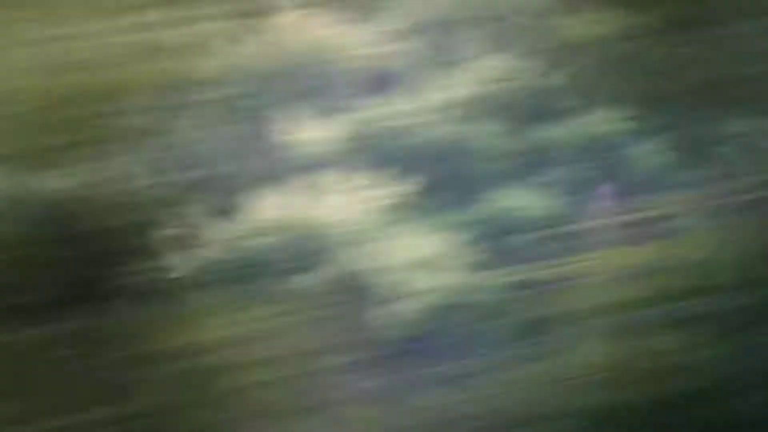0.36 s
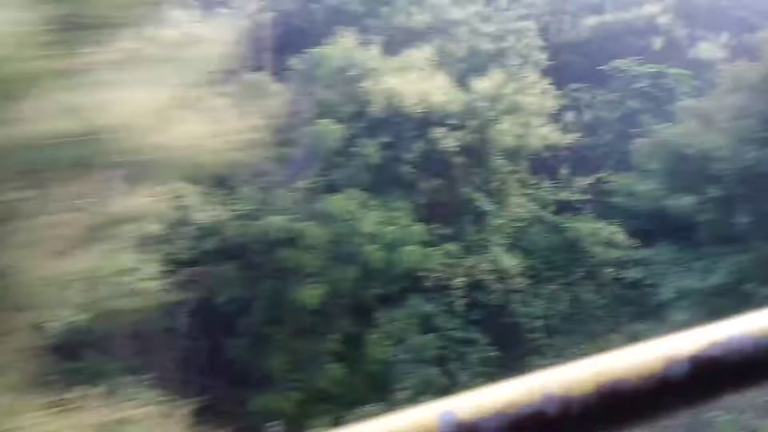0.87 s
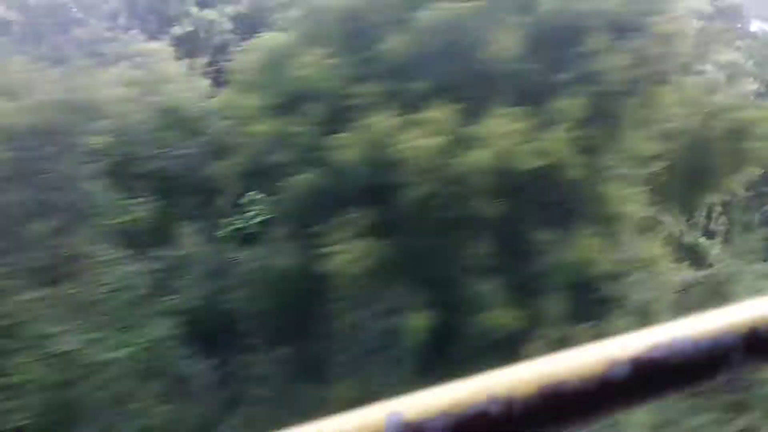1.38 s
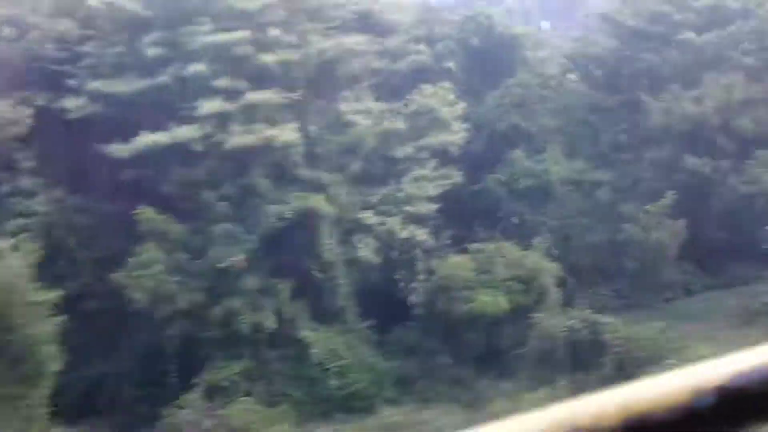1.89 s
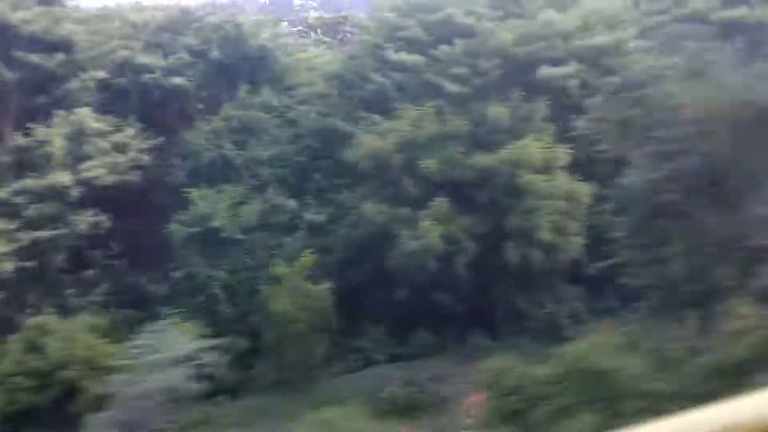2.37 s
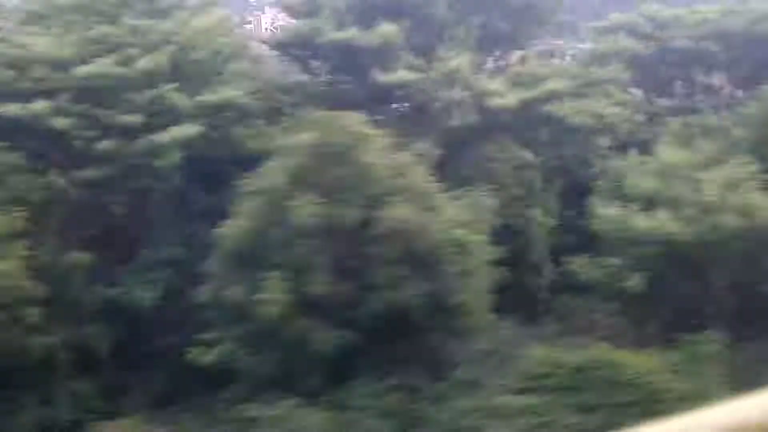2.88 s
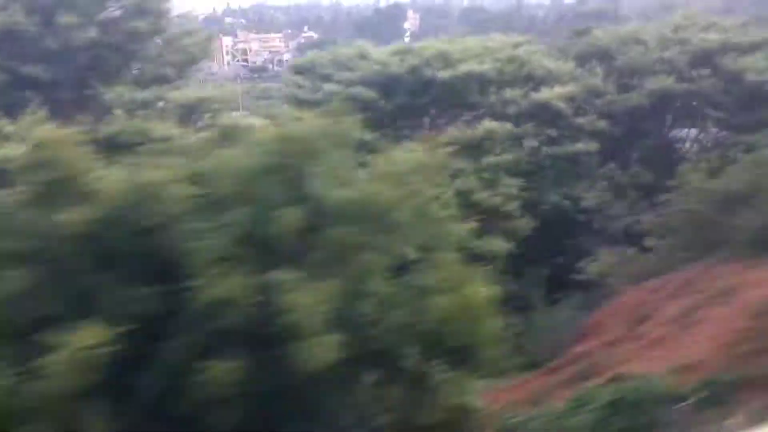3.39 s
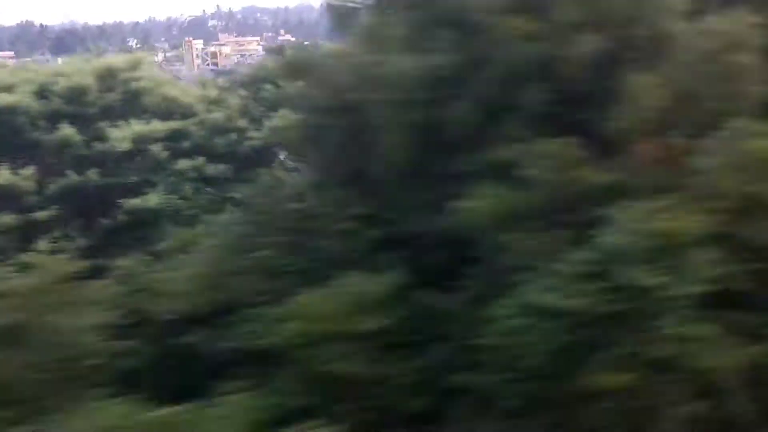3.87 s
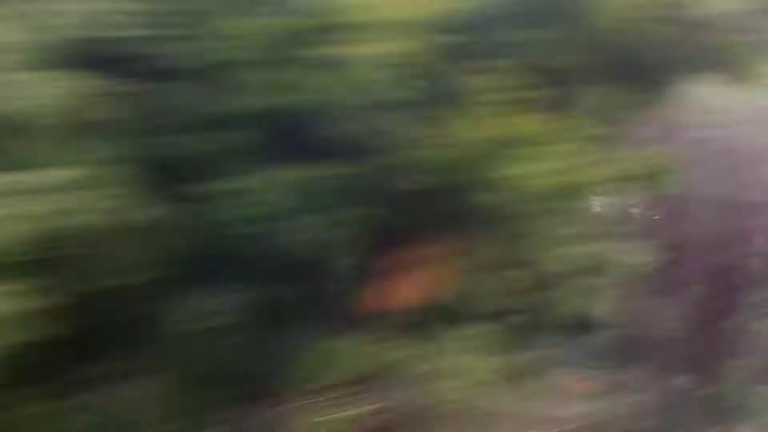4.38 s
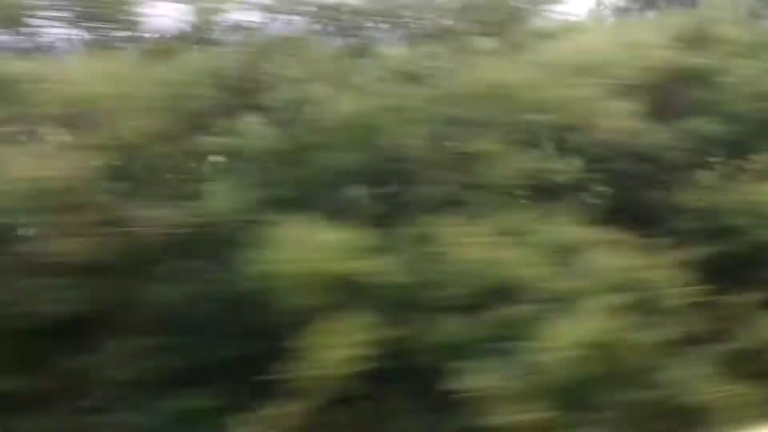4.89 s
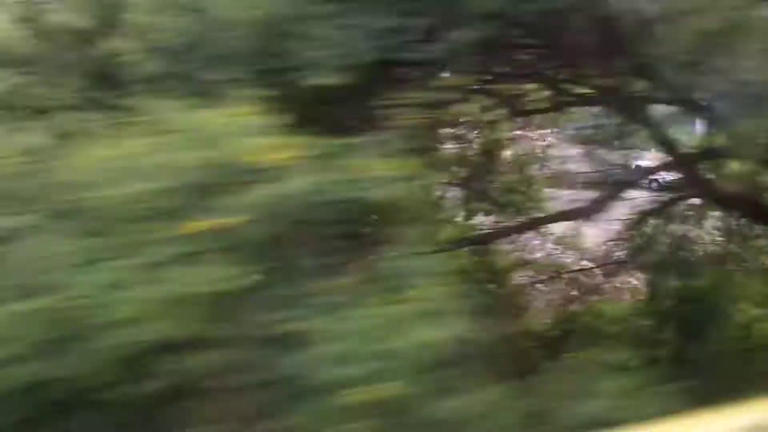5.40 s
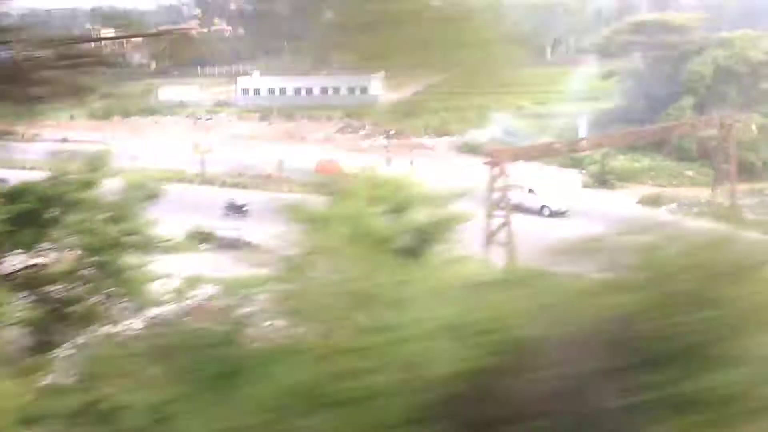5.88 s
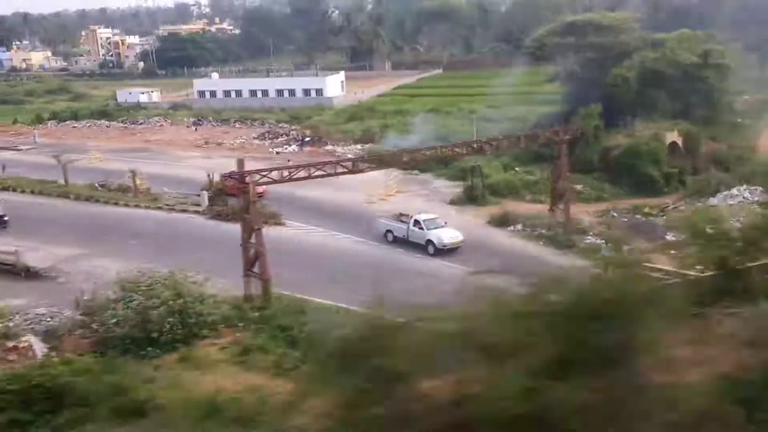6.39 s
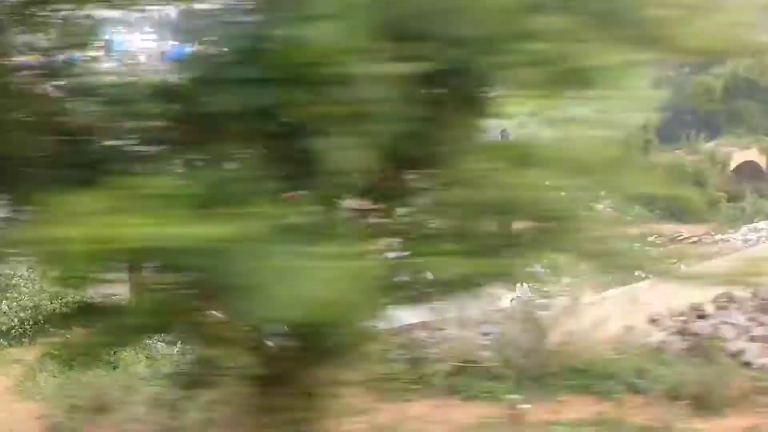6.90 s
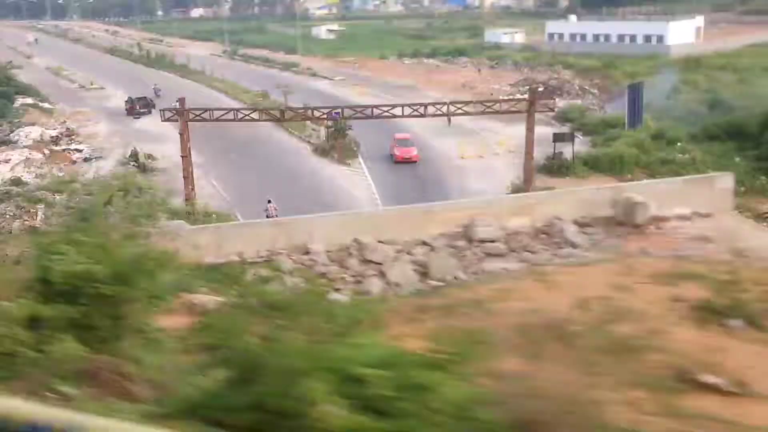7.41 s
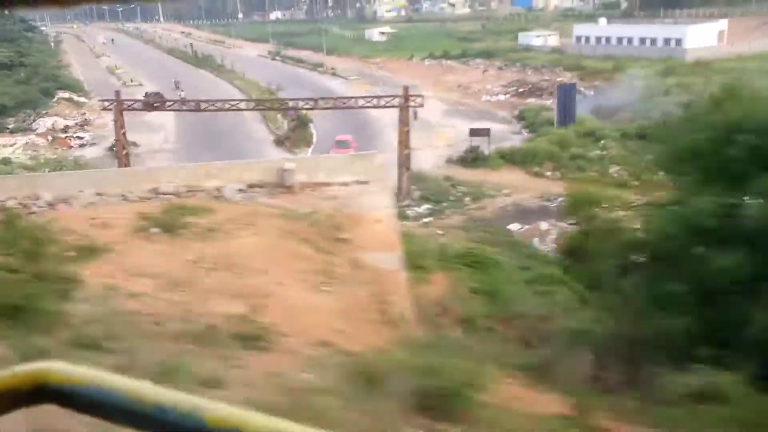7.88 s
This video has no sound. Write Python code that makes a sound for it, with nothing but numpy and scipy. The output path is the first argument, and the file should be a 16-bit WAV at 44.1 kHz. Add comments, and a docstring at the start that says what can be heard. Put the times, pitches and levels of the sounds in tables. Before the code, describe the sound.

A handheld microphone at a moving train's window catches heavy, bassy wind buffeting with short snaps. Beneath it the carriage rumbles, wheels give an airy roar, and bogies knock over joints in quick double blows. Strong gusts open the scene, crowd the middle, return after six seconds, thin out past seven and swell again at the close. Wind and wheels differ in the two channels, with little room echo.

```python
"""Wind thuds and snaps at an open window of a passenger carriage at speed, over rumble and roar.
Wheels on rails are filtered noise; knocks over the joints, mostly in pairs, are struck resonances.
The slipstream is lumpy low noise, and its eddies are clusters of jolts on the front port.
There are two microphone ports; each channel is one port minus a delayed copy of the other."""
import sys
import numpy as np
from scipy import signal
from scipy.fft import rfft, irfft, next_fast_len
from scipy.io import wavfile
from scipy.ndimage import uniform_filter1d

SR = 44100
rng = np.random.default_rng(int(sys.argv[2]) if len(sys.argv) > 2 else 0)


def wrap_up_sound(samples):
    """Save the sound to the file named by the first command line argument, as 16-bit audio."""
    columns = np.atleast_2d(samples).T
    # keep every value between -1 and 1, then stretch to whole-number steps
    tamed = np.clip(columns, -1, 1)
    steps = np.round(tamed * 32767).astype(np.int16)
    wavfile.write(sys.argv[1], SR, steps)


def nominal_scale(level):
    """Amplitude ratio for a level in decibels (scalar or array-like)."""
    x = np.asarray(level, float) / 20
    return 10 ** x


N = 353682


def rms_one(x):
    """Scale to unit rms."""
    return x / np.sqrt(np.mean(x ** 2) + 1e-20)


def in_time(rows):
    """Read the level columns of a table at every sample."""
    s, *columns = np.transpose(rows)
    return [np.interp(np.arange(N) / SR, s, column) for column in columns]


def drift(rate_hz):
    """Slow random wander of unit rms, about rate_hz changes a second."""
    hop = 40   # samples between the points of the slow curve
    settle = 2000   # points thrown away while the filter settles
    pole = np.exp(-2 * np.pi * rate_hz * hop / SR)
    steps = rng.standard_normal(N // hop + settle + 2)
    slow = signal.lfilter([1], [1, -2 * pole, pole ** 2], steps)[settle:]
    return np.interp(np.arange(N) / hop, np.arange(len(slow)), rms_one(slow))


def band(x, low_hz, high_hz, order=2):
    """Butterworth band-pass."""
    sos = signal.butter(order, [low_hz, high_hz], "band", fs=SR, output="sos")
    return signal.sosfilt(sos, x + 1e-18)


def low_pass(top_hz, order):
    """Butterworth low-pass sections."""
    return signal.butter(order, top_hz, fs=SR, output="sos")


def coloured(spectrum, shared_db, own_db, rate_hz, grain_db=0):
    """Unit-rms noise of a given spectrum whose half octaves flicker partly together; grain makes it pop."""
    size = next_fast_len(N)
    hz = np.maximum(np.arange(size // 2 + 1) * SR / size, 10)
    point_hz, point_db = np.transpose(spectrum)
    grain = nominal_scale(grain_db * np.minimum(rng.exponential(1, size), 7))
    white = rng.standard_normal(size) * grain
    # straight lines in dB over log frequency, near silence outside the table
    shaped = rfft(white) * nominal_scale(np.interp(np.log(hz), np.log(point_hz), point_db, -80, -80))
    together_db = shared_db * drift(rate_hz)
    out = 0
    for step in range(20):
        share = np.cos(np.pi / 2 * np.clip(2 * np.log2(hz / 25) - step, -1, 1)) ** 2
        half_octave = irfft(shaped * share, size)[:N]
        out = out + half_octave * nominal_scale(together_db + own_db * drift(rate_hz))
    return rms_one(out)


def delayed(x, lag):
    """Delay by any number of samples, as a phase slope."""
    size = next_fast_len(N + 64)
    phase = np.exp(-2j * np.pi * np.arange(size // 2 + 1) * lag / size)
    return irfft(rfft(x, size) * phase, size)[:N]


def mic_hiss():
    """Faint self-noise of the rear microphone, a hiss in the top of the treble."""
    return nominal_scale(-68.5) * rms_one(band(rng.standard_normal(N), 6600, 16300))


# brief dips of the steady sound: [t/s, depth/dB]
LEVEL_DIPS = [(0.245, 8), (1.175, 8.5), (5.064, 5), (6.797, 9)]


def level_dips(fall_s=0.0017, recover_s=0.36):
    """Gain curve of the steady sound: at listed moments it falls fast and creeps back exponentially."""
    t = np.arange(N) / SR
    dip_db = 0
    for s, depth_db in LEVEL_DIPS:
        since = np.maximum(t - s, 0)
        dip_db = dip_db + depth_db * np.exp(-since / recover_s) * (1 - np.exp(-since / fall_s))
    return nominal_scale(-dip_db)


# rolling noise, swelling with track and trackside: [t/s, rumble level/dB, roar level/dB]
ROLLING_LEVELS = [(0.0, -26.5, -32.4), (0.15, -42, -39), (0.5, -32.5, -38), (0.72, -49, -41.5),
                  (1.0, -32.5, -39.5), (1.17, -34.5, -42.5), (1.53, -29, -41), (1.8, -34.5, -42.5),
                  (2.02, -25.5, -37.5), (2.22, -28.5, -40), (2.53, -31.5, -36.5), (2.72, -36, -40),
                  (3.0, -23, -34), (3.37, -35.5, -39.5), (3.61, -29.5, -40), (3.98, -25.5, -36.5),
                  (4.27, -28, -36.5), (4.67, -21.5, -35), (4.87, -20, -30), (5.06, -22, -35),
                  (5.5, -27.5, -37), (5.8, -24.5, -32.5), (5.95, -28.5, -37.5), (6.16, -30, -38),
                  (6.25, -23.5, -34), (6.51, -33.5, -40), (6.72, -35, -43.5), (6.79, -25.5, -35.5),
                  (6.94, -24.5, -35.5), (7.04, -35, -39.5), (7.12, -36, -37.5), (7.35, -34, -42),
                  (7.59, -32.5, -37), (8.01, -23, -31)]
# carriage body and bogie rumble: [f/Hz, level per Hz/dB]
RUMBLE_SPECTRUM = [(25, -29), (70, -13), (170, -1), (230, -4), (310, -12), (430, -9), (650, -22),
                   (950, -20), (1250, -21.5), (1550, -45), (2500, -51)]
# wheel and rail roar: [f/Hz, level per Hz/dB]
ROAR_SPECTRUM = [(700, 0), (1400, -7.5), (2000, 0.5), (2250, -2.5), (2550, 1), (2850, -3.5), (3300, -3.5),
                 (5000, -10.5), (7000, -18.5), (10000, -26.5), (15000, -39)]


def rolling():
    """Rough wheels on rough rail: a lumpy rumble through the body and a smoother roar through the air."""
    rumble_db, roar_db = in_time(ROLLING_LEVELS)
    rumble = nominal_scale(rumble_db) * coloured(RUMBLE_SPECTRUM, shared_db=1.5, own_db=1.5, rate_hz=7.7)
    roar = nominal_scale(roar_db) * coloured(ROAR_SPECTRUM, shared_db=1.02, own_db=1.0, rate_hz=9.8)
    return rumble + roar


def scattered_roar():
    """Roar scattered about the carriage: a band of noise that follows the roar level."""
    roar_db = in_time(ROLLING_LEVELS)[1]
    return nominal_scale(roar_db - 15.5) * rms_one(band(rng.standard_normal(N), 1280, 2180))


# a bogie crossing a rail joint: [t/s, first axle level/dB, second axle level/dB], relative levels
RAIL_JOINTS = [(0.384, -23, -23.5), (0.937, -18.5, -22.5), (1.993, -12, -15.5), (2.8, -17, -16),
               (2.997, -12, -34), (3.095, -8.5, -18), (3.433, -18, -19), (3.641, -16.5, -31),
               (4.182, -10, -15.5), (4.421, -13, -13), (4.716, -9.5, -9), (5.041, -15, -37),
               (5.745, -9, -22), (6.232, -6, -31), (6.563, -22, -19.5), (6.769, -13, -19),
               (7.451, -18, -39), (7.514, -16.5, -19), (7.788, -16, -38), (7.978, -28, -30)]
# resonances of bogie and floor struck at a joint: [f/Hz, relative level/dB, t60/s]
BOGIE_MODES = [(152, -0.5, 0.098), (204, 5.5, 0.061), (260, -6.5, 0.052), (435, -4.5, 0.044),
               (553, -13.5, 0.084), (856, -11, 0.033)]


def joints(axle_gap_s=0.12):
    """Each knock is a few close blows that ring the bogie, with a short rush of roar."""
    s, first_db, second_db = np.transpose(RAIL_JOINTS)
    s = np.minimum(np.append(s, s + axle_gap_s), (N - 1) / SR)
    level_db = np.append(first_db, second_db)
    ringing, rush = np.zeros(N), np.zeros(N)
    for late_s, blow_db in [(0, -3), (.007, -4), (.016, -9.5)]:
        at = np.minimum(((s - .003 + late_s) * SR).astype(int), N - 1)
        for hz, mode_db, t60 in BOGIE_MODES:
            strike_db = level_db + blow_db + mode_db - 2 + rng.normal(0, 0.87, len(s))
            clicks = np.zeros(N)
            clicks[at] = nominal_scale(strike_db) * rng.choice([-1, 1], len(s))
            r, w = nominal_scale(-60 / (t60 * SR)), 2 * np.pi * hz / SR   # decay and turn per sample
            resonator = [1, -2 * r * np.cos(w), r * r]
            ringing += signal.lfilter([0, np.sin(w)], resonator, clicks + 1e-18)
    rush[(s * SR).astype(int)] = nominal_scale(level_db - 24.5)
    fade = nominal_scale(-60 / (.15 * SR))   # 60 dB down in 0.15 s
    rush_level = signal.lfilter([1], [1, -fade], rush)
    rush_noise = rms_one(band(rng.standard_normal(N), 1400, 3800))
    return band(ringing, 70, 2400, order=1) + rush_level * rush_noise


# steady turbulence on the front port, between the strong eddies: [t/s, level/dB]
SLIPSTREAM_LEVELS = [(0.0, -31), (0.3, -27), (0.65, -31.5), (1.3, -30.5), (1.72, -36), (2.14, -26),
                     (2.9, -27), (3.64, -26), (4.1, -29.5), (4.98, -26.5), (5.35, -31), (5.68, -21),
                     (6.1, -29), (6.8, -24), (7.37, -32), (7.49, -27), (7.6, -35), (8.01, -17.5)]
# wind pressure at the port: [f/Hz, level per Hz/dB]
WIND_SPECTRUM = [(20, -16), (60, -1.5), (150, 0), (300, -4.5), (600, -11.5), (1000, -17.5), (1800, -35),
                 (2600, -41)]


def slipstream(stir_db=-11.5, rise_s=0.016, fall_s=0.038):
    """Small eddies pass all the time: lumpy low noise full of little pops, swelling around strong ones."""
    level_db, = in_time(SLIPSTREAM_LEVELS)
    t = np.arange(0, N, 64) / SR
    stirred = 0   # power stirred up around each strong eddy, stir_db against its thud
    for s, thud_db, *_ in STRONG_EDDIES:
        swell = np.exp(-((t - s) / np.where(t < s, rise_s, fall_s)) ** 2)
        stirred = stirred + nominal_scale(thud_db + stir_db) ** 2 * swell
    level = np.sqrt(nominal_scale(level_db) ** 2 + np.interp(np.arange(N) / SR, t, stirred))
    return level * coloured(WIND_SPECTRUM, shared_db=3.0, own_db=1.5, rate_hz=30, grain_db=4)


def small_eddies(count):
    """Weak eddies at random moments, their thuds following the turbulence level."""
    draw = rng.random((count, 4))
    s = draw[:, 0] * N / SR
    thud_db = np.interp(s, *np.transpose(SLIPSTREAM_LEVELS)) + 2.5 + 10 * (draw[:, 1] - .5)
    length_ms = 12 * (.5 + draw[:, 2])
    snap_db = thud_db - 13 + 11.6 * (draw[:, 3] - .5)
    return list(zip(s, thud_db, length_ms, snap_db))


# strong eddies bursting on the front port: [snap t/s, thud level/dB, length/ms, snap level/dB]
STRONG_EDDIES = [(0.014, -8.5, 16, -40), (0.129, -12, 7.8, -18), (0.175, -9, 7.9, -20),
                 (0.195, -12, 17, -17.5), (0.225, -7, 6, -15.5), (0.238, -8.5, 9, -29),
                 (0.328, -19, 14, -44), (0.347, -16, 13, -25), (0.439, -13, 10, -26),
                 (0.557, -18.5, 28, -32), (0.664, -17, 16, -52), (0.7, -18, 11, -24),
                 (0.748, -10, 7.9, -30), (0.798, -13, 53, -41), (0.966, -18, 10, -28),
                 (1.016, -19, 24, -45), (1.118, -14, 25, -26.5), (1.166, -9, 9.9, -18.5),
                 (1.312, -13.5, 17, -51), (1.381, -11, 9.1, -38), (1.514, -21, 16, -22),
                 (1.642, -21, 23, -29), (1.783, -13, 5.1, -19.5), (1.878, -7, 23, -19.5),
                 (1.902, -12.5, 35, -21), (1.991, -13, 6, -25), (2.132, -8, 26, -33), (2.157, -13, 18, -19),
                 (2.234, -20, 3.8, -23), (2.361, -14, 29, -23), (2.396, -32, 10, -28),
                 (2.513, -16, 18, -28), (2.567, -11.5, 15, -23), (2.623, -13.5, 34, -46),
                 (2.698, -14.5, 20, -17), (2.711, -10.5, 12, -26), (2.757, -13.5, 6.7, -25),
                 (3.116, -8.5, 12, -30), (3.138, -10.5, 19, -28), (3.153, -13, 16, -30),
                 (3.238, -9, 21, -29), (3.331, -14, 12, -39), (3.348, -9.5, 9.3, -26),
                 (3.454, -10, 32, -25.5), (3.544, -16, 6.5, -23), (3.58, -14, 7.8, -20),
                 (3.626, -10, 29, -30), (3.659, -8, 19, -47), (3.728, -12, 17, -18), (3.763, -17, 16, -42),
                 (3.832, -15, 16, -48), (3.871, -14.5, 11, -24), (4.147, -16, 23, -27),
                 (4.164, -10.5, 19, -35), (4.299, -17, 11, -22), (4.329, -16.5, 5.7, -43),
                 (4.415, -11, 4.5, -20.5), (4.426, -19, 11, -26), (4.684, -16, 66, -21.5),
                 (4.741, -11, 20, -25), (4.926, -17, 27, -40), (4.948, -11, 8.7, -31),
                 (4.993, -9.5, 43, -24), (5.022, -15.5, 33, -20), (5.059, -14, 11, -14),
                 (5.09, -17, 10, -23), (5.137, -11.5, 17, -24), (5.195, -11, 45, -22.5),
                 (5.477, -11.5, 48, -25), (5.514, -12, 8.6, -45), (5.559, -16, 4.1, -30),
                 (5.629, -12, 24, -17), (5.643, -17, 26, -23), (5.688, -13.5, 9, -14),
                 (5.704, -11, 8.7, -18), (5.749, -18, 10, -36), (5.83, -16, 14, -25), (5.86, -12, 16, -31),
                 (5.873, -9.5, 51, -23), (6.373, -7, 26, -17), (6.4, -21, 34, -21.5),
                 (6.428, -13, 17, -20.5), (6.449, -12.5, 14, -16.5), (6.476, -16, 12, -51),
                 (6.678, -23, 7.4, -25), (6.749, -12, 11, -32), (6.768, -7.5, 20, -18),
                 (6.783, -16, 3.4, -12), (6.848, -14.5, 55, -25.5), (6.933, -18, 24, -23),
                 (6.948, -14, 6, -16.5), (6.967, -23, 38, -25), (7.061, -22, 26, -31),
                 (7.106, -15, 40, -23), (7.142, -25, 5.7, -30), (7.455, -19, 29, -28), (7.827, -14, 8, -21),
                 (7.871, -18, 7.5, -21), (7.967, -41, 26, -22.5), (7.999, -10, 15, -18.5)]


def buffets(jolts_per_s=450, spread_db=7.0):
    """Each eddy clusters pressure jolts round a strong core: a thud near 150 Hz, a snap up to about 2 kHz."""
    out, span = np.zeros(N + 8192), 4096
    ms = (np.arange(2 * span) - span) * 1000 / SR
    for s, thud_db, length_ms, snap_db in list(STRONG_EDDIES) + small_eddies(count=30):
        size = rng.exponential(1, 2 * span)
        sign = rng.choice([-1, 1], 2 * span)
        chance = rng.random(2 * span)
        build_ms, tail_ms = 0.39 * length_ms, max(0.45 * length_ms - 1.5, 1)
        shape = np.exp(-(ms / np.where(ms < 0, build_ms, tail_ms)) ** 2)
        hit = chance < jolts_per_s / SR   # the rate at the core, before the shape fades the jolts
        jolts = shape * sign * hit * nominal_scale(spread_db * np.minimum(size, 2.5))
        core = np.where(ms == 0, sign, 0)
        thud = band(band(jolts + 1.64 * core, 91, 186, order=1), 66, 350, order=1)
        rustle = 0.17 * sign * shape
        snap = band(band(jolts + 6.1 * core + rustle, 640, 887, order=1), 500, 2020, order=3)
        # level is the rms of the loudest 7 ms of the thud and 3 ms of the snap
        thud = thud / np.sqrt(uniform_filter1d(thud ** 2, size=310).max())
        snap = snap / np.sqrt(uniform_filter1d(snap ** 2, size=130).max())
        burst = nominal_scale(thud_db) * thud + nominal_scale(snap_db) * snap
        start = int((s - .001) * SR) - span
        out[max(start, 0):start + 2 * span] += burst[max(-start, 0):]
    return out[:N]


def scene():
    """Signals of the front and rear ports: wind strikes the front, the wheels are bright at the rear."""
    steady = level_dips()
    wheels = steady * rolling() + joints()
    # the front port faces away from the wheels and hears them dull
    dull = signal.sosfiltfilt(low_pass(950, order=3), wheels)
    air = scattered_roar() + slipstream()   # at the front port alone
    wind = signal.sosfilt(low_pass(2830, order=6), steady * air + buffets())
    return np.array([dull + wind, wheels + steady * mic_hiss()])


def top_cut(x):
    """Nothing passes above the cut-off."""
    return signal.sosfilt(signal.butter(12, 15340, fs=SR, output="sos"), x)


def record(dry):
    """Each port is delayed (in samples) and taken from the other; peaks beyond full scale are clipped."""
    front, rear = dry
    left = front - delayed(rear, lag=24.83)
    right = rear - delayed(front, lag=18.0)
    mix = np.clip(np.array([left, right]), -1, 1)
    return top_cut(mix)


dry = scene()
out = record(dry)
wrap_up_sound(out)
```